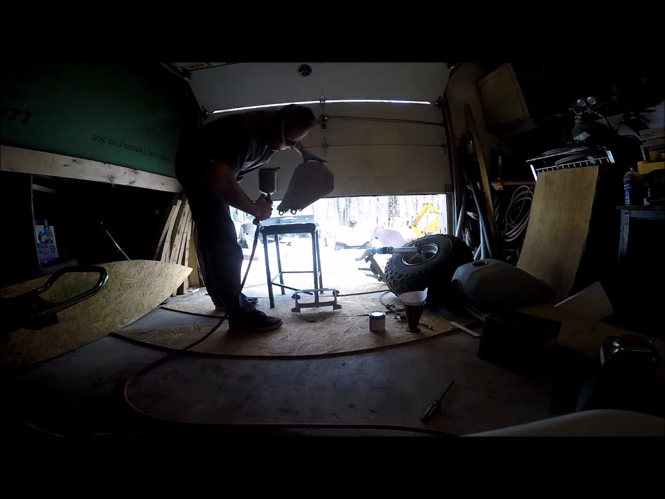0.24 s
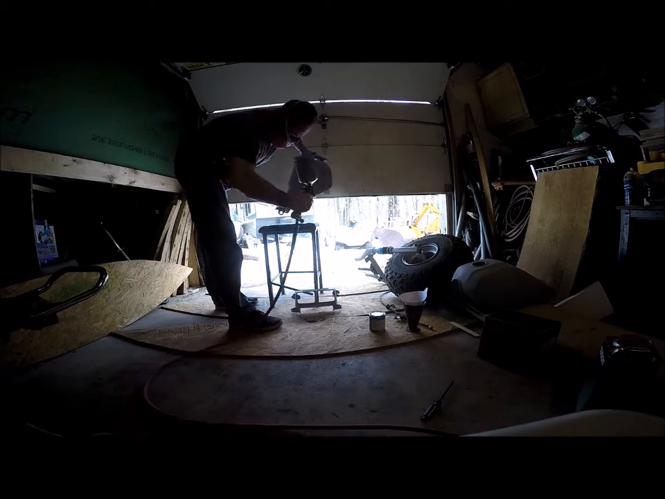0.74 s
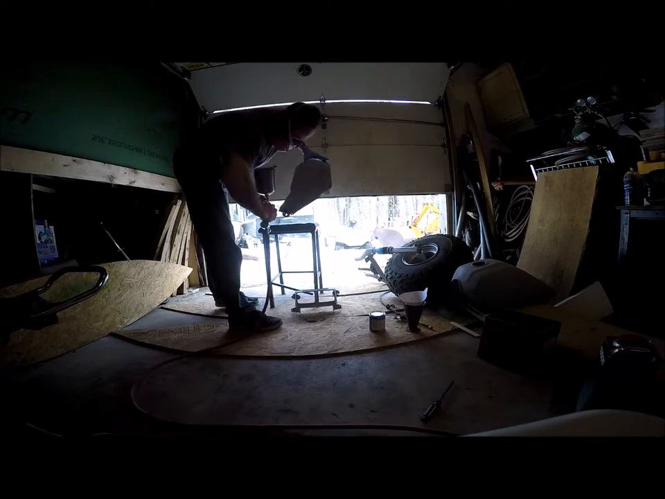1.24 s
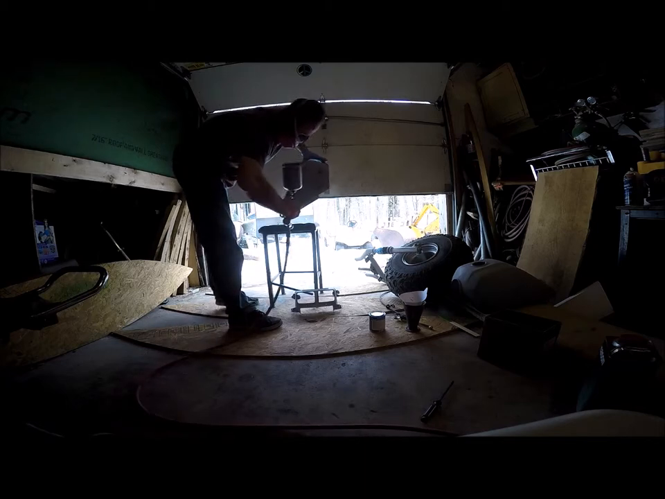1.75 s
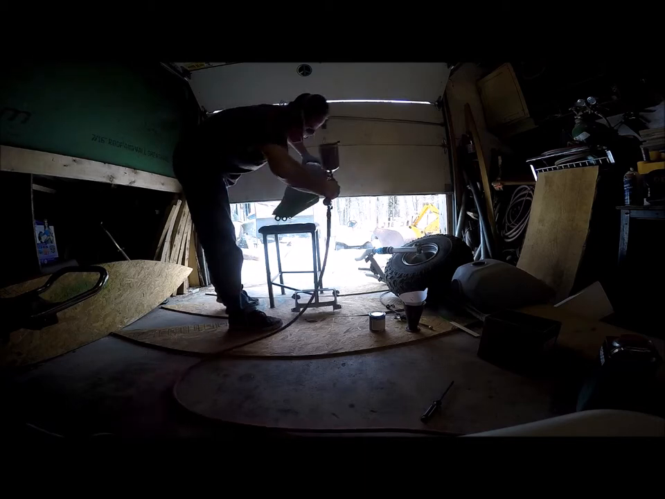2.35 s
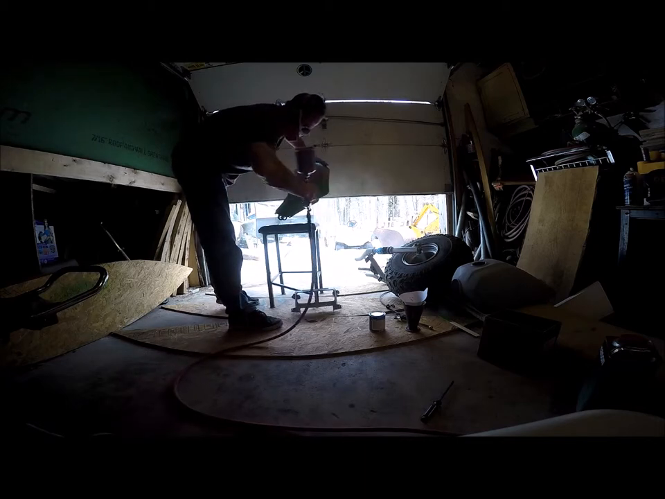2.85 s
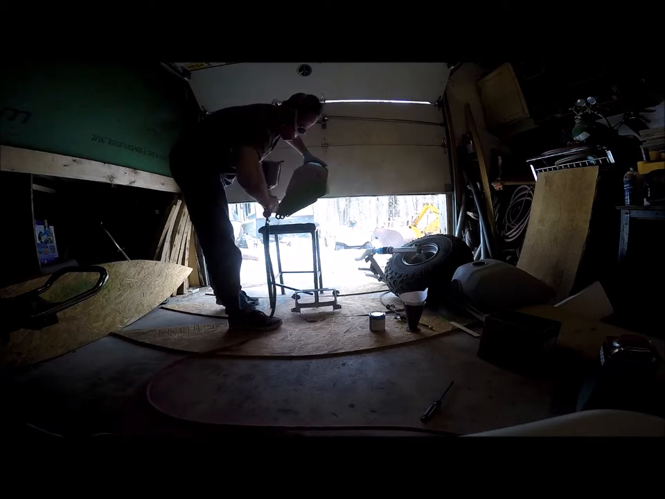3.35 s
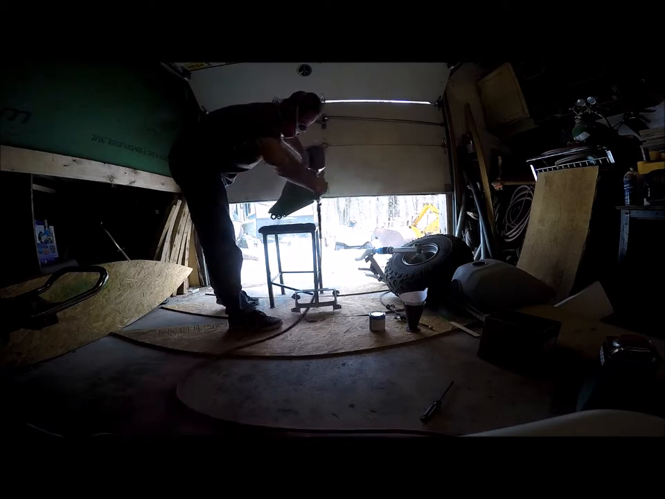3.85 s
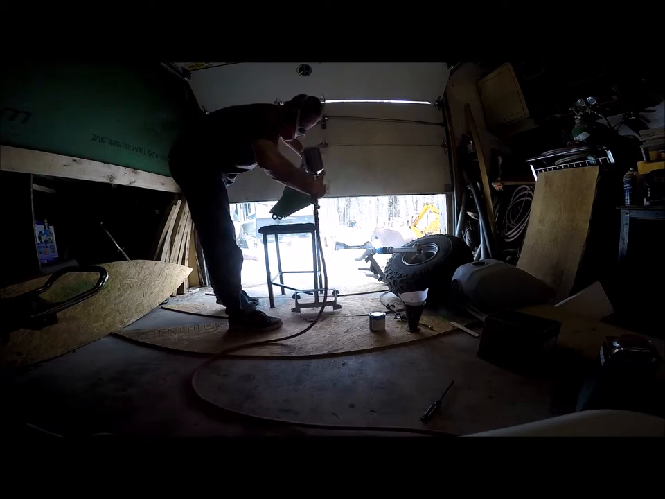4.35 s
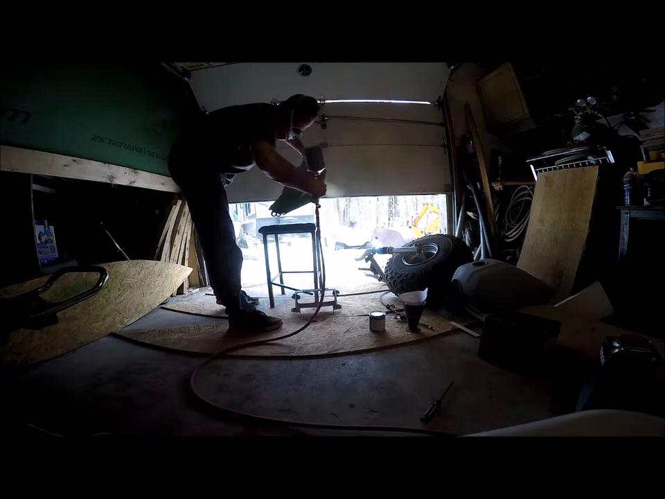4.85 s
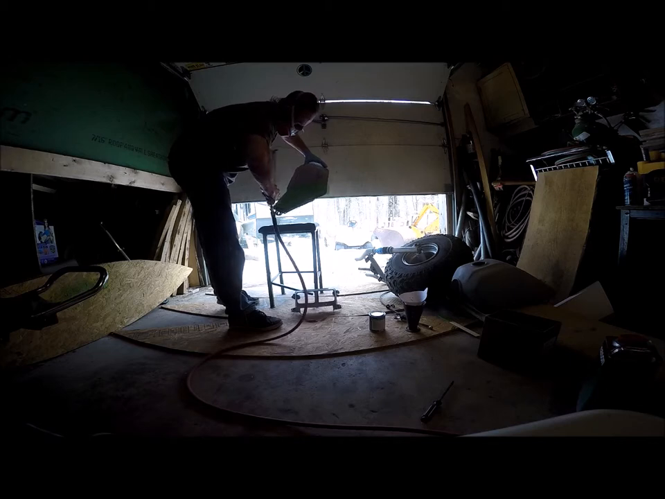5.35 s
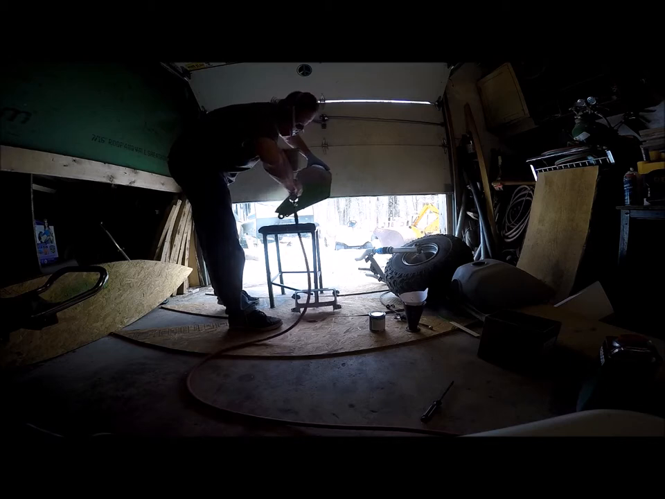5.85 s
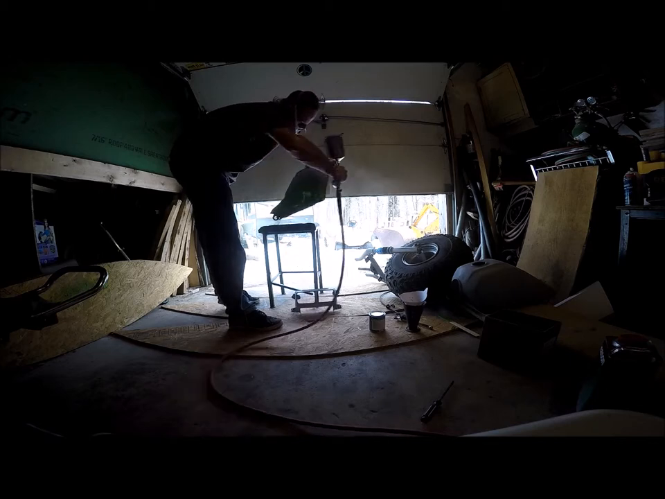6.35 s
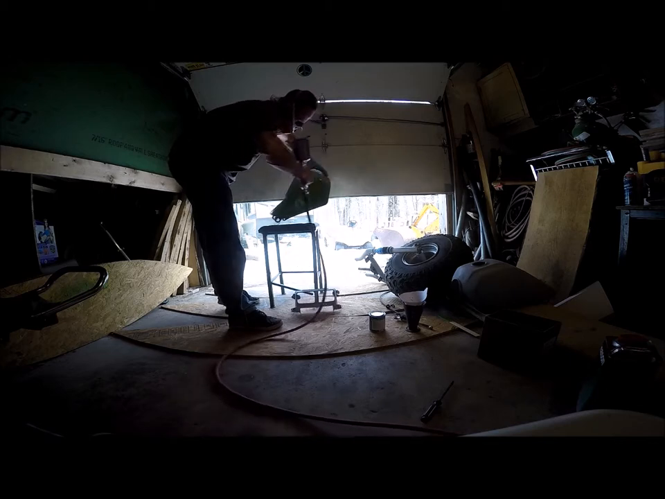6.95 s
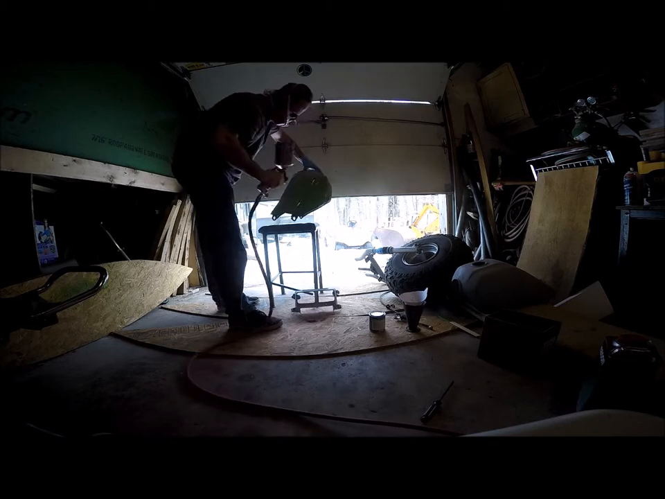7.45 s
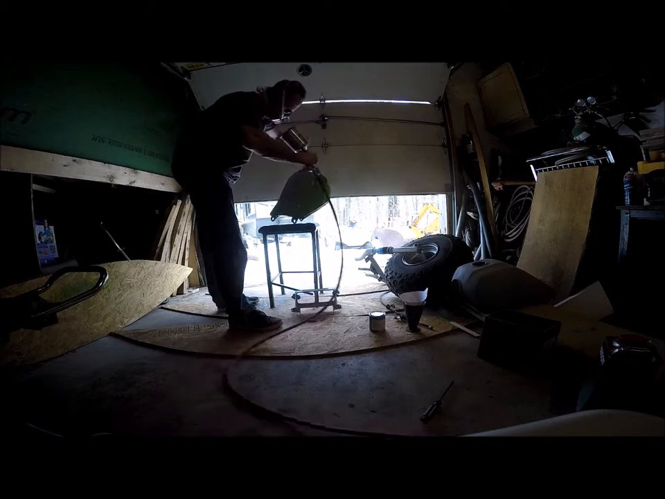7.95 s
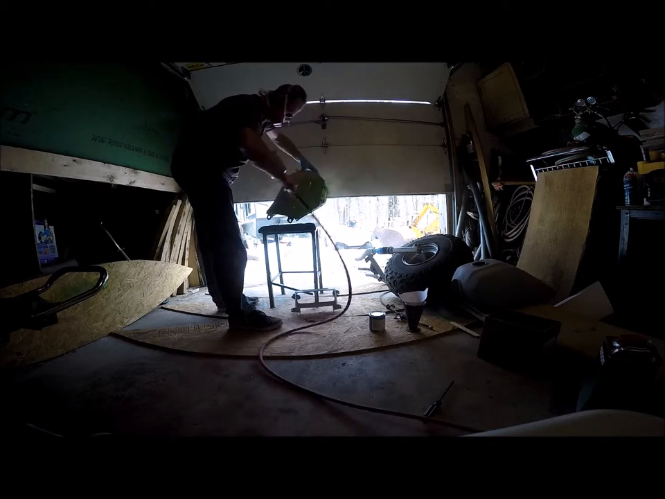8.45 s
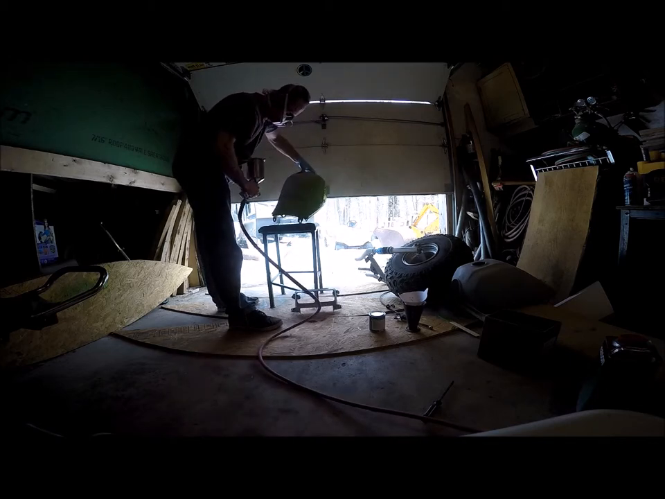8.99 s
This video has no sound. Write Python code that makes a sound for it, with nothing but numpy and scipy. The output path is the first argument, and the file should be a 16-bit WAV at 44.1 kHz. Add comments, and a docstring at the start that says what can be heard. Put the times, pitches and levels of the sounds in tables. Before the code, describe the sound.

A compressed-air spray gun works in short passes in a cluttered garage, heard in mono from a few metres away, with a short roomy tail. Quiet low rumble and faint hum lie underneath. Bright hissing bursts run at about 0.3-0.7, 1.5-2.3, 2.6-3.3, 3.5-4.0, 4.8-5.2, 5.7-6.3, 6.7-7.2, 8.1-8.7 and, somewhat softer, 9.1-9.6 seconds. Each opens with a quick louder surge and low puff, settles to a steady jet, and shuts fast with another soft puff; a thin hose hiss then sinks and fades. The jet slaps the panel at 0.3 and more strongly at 2.6, and a hollow roar swells as it sweeps across, clearest near 0.5 and 1.8-2.1. Low fluttering buzzes appear around 7.0 and 8.4. Soft scuffs fall near 2.4, 3.4, 7.3 and 8.1.

```python
"""In a cluttered garage, a compressed-air spray gun makes nine short passes over a hanging panel.
Each trigger pull lets stored hose pressure out as a surge of hiss that settles to a steady jet, with puffs
at start and stop; the jet roars, slaps and at times flutters on the panel: coloured noise, modes and sines.
Resonances of the air line sing on as it refills, and soft scuffs of noise fall between passes.
A low rumble and a faint hum lie underneath; sparse echoes give the room, heard in mono a few metres away."""
import sys
import numpy as np
from scipy import signal
from scipy.fft import rfft, irfft
from scipy.io import wavfile
from scipy.ndimage import uniform_filter1d

SR = 44100
rng = np.random.default_rng(int(sys.argv[2]) if len(sys.argv) > 2 else 0)


def pcm_store(signal):
    """Save signal as 16-bit PCM."""
    levels = np.round(np.clip(np.atleast_2d(signal), -1, 1) * 32767)
    wavfile.write(sys.argv[1], SR, levels.astype(np.int16).T)


N = 406602
TIME = np.arange(N) / SR
# times and frequencies of the noise spectrogram, in frames of 1024 samples every 256
FRAME_S = np.arange(N // 256 + 5)[:, None] * 256 / SR
BIN_HZ = np.fft.rfftfreq(1024, 1 / SR)


def gain_of(db):
    """Decibels to amplitude."""
    return 10 ** (np.asarray(db) / 20)


def evened(x):
    """Scales to rms 1."""
    return x / np.sqrt(np.mean(x ** 2) + 1e-20)


def steadied(x):
    """Holds narrow noise near rms 1 over every twentieth of a second."""
    return x / np.sqrt(uniform_filter1d(x ** 2, size=2200) + 1e-6)


def read(points, hz=BIN_HZ):
    """Joins the points of a curve by straight lines on a log-frequency axis."""
    point_hz, value = np.transpose(points)
    return np.interp(np.log(hz + 1), np.log(point_hz + 1), value)


def noise(colour_db, patchy_db):
    """Noise of rms 1 with a given colour and small drifting patches of turbulence."""
    real, imaginary, patches = rng.standard_normal((3, len(FRAME_S), len(BIN_HZ)))
    patches = uniform_filter1d(patches, size=8, axis=0)
    patches = evened(uniform_filter1d(patches, size=8, axis=1))
    spectrum = (real + 1j * imaginary) * gain_of(colour_db + patchy_db * patches)
    return evened(signal.istft(spectrum.T, nperseg=1024, noverlap=768)[1][:N])


def resonate(x, hz, width):
    """A resonance of gain 1 that can follow a moving frequency."""
    # shift the resonance down to 0 Hz, smooth there, shift back up
    turn = np.exp(2j * np.pi * np.cumsum(hz * np.ones(len(x))) / SR)
    r = np.exp(-np.pi * width / SR)
    return 2 * (turn * signal.lfilter([1 - r], [1, -r], x / turn + 1e-18)).real


def ringing(hz, width):
    """White noise through the same resonance twice, at rms 1."""
    once = resonate(rng.standard_normal(N), hz, width)
    return evened(resonate(once, hz, width))


def swell(s, length):
    """A smooth hump of height 1 centred on s, taking length to rise and again to fall."""
    return np.cos(np.pi / 2 * np.clip((TIME - s) / length, -1, 1)) ** 2


def gust(s, rise_s):
    """A push that starts at s, peaks at 1 after rise_s and dies away."""
    u = np.maximum(TIME - s, 0) / rise_s
    return u * np.exp(1 - u)


def valve(pulled, released, opening_s=0.018, closing_s=0.011):
    """Air flow of one pass: the valve opens fast, and the air cap empties after it shuts."""
    opening = np.clip((TIME - pulled) / opening_s, 0, 1) ** 1.27
    return opening * np.exp(-np.maximum(TIME - released, 0) / closing_s)


# Colour of the garage's rumble and thin hiss. Each row: frequency in Hz, density in dB per Hz (relative).
GARAGE_COLOUR = [(15, -20), (25, -4), (55, 0), (85, -6), (120, -4), (150, -15), (330, -11.5), (450, -9),
                 (560, -22), (1300, -27), (6000, -27.5), (7500, -35), (15000, -40.5)]
# Faint wavering hum. Each row: frequency in Hz, level in dB.
HUM_TONES = [(58, -62), (118, -66)]


def background(level_db=-54):
    """Low rumble and thin hiss drift slowly in level; narrow bands of noise make a wavering hum."""
    hum = sum(gain_of(db) * ringing(hz, width=3.3) for hz, db in HUM_TONES)
    drift_hz = np.geomspace(.7, 6, 10)
    drift_db = evened(sum(np.sin(2 * np.pi * (hz * FRAME_S + rng.random())) for hz in drift_hz))
    return gain_of(level_db) * noise(read(GARAGE_COLOUR) + drift_db, patchy_db=0.5) + hum


# The nine passes of the gun. Each row: trigger pulled in seconds, trigger released in seconds,
# steady hiss in dB, surge above it in dB, opening puff in dB, closing puff in dB.
GUN_PASSES = [(0.282, 0.696, -31, 5.5, -34, -39), (1.492, 2.304, -31, 4.5, -37, -43.5),
              (2.64, 3.288, -31, 6.5, -36.5, -40), (3.497, 4.014, -30.5, 4.5, -37.5, -39.5),
              (4.824, 5.166, -31, 6.5, -38.5, -40), (5.659, 6.346, -31, 4, -40, -45),
              (6.693, 7.183, -30.5, 5, -38, -38), (8.148, 8.686, -31, 6, -41, -38),
              (9.143, 9.6, -34.5, 7, -38, -42)]
# Colour of the nozzle hiss. Each row: frequency in Hz, density in dB per Hz (relative).
HISS_COLOUR = [(150, -36), (700, -24), (1000, -16.5), (1230, -23.5), (1500, -14.5), (1850, -14.5),
               (2350, -8.5), (3200, -8), (3950, -4), (4500, -5.5), (5300, -0.5), (6300, -3.5), (7100, -7.5),
               (8750, -12.5), (9700, -10), (11900, -12), (13100, -9), (15300, -14)]


def jet(surge_s=0.049, shake=0.065):
    """Nozzle hiss: the pressure stored in the hose overshoots, then settles to a steady flow."""
    flow, level = np.zeros(N), np.zeros(N)
    for pulled, released, hiss_db, surge_db, *_ in GUN_PASSES:
        held = np.clip(TIME - pulled, 0, released - pulled)
        stored = np.exp(-(held / surge_s) ** 4)
        burst = valve(pulled, released) * gain_of(surge_db * stored)
        flow += burst
        level += gain_of(hiss_db) * burst
    unsteady = 1 + shake * evened(uniform_filter1d(rng.standard_normal(N), size=500))
    hiss = noise(read(HISS_COLOUR) + reflections_db(), patchy_db=0.46)
    # a faster jet is brighter: the treble grows more steeply with the flow
    treble_filter = signal.butter(2, 7500, "high", fs=SR, output="sos")
    treble = signal.sosfiltfilt(treble_filter, hiss)
    hiss = hiss + treble * (flow ** 0.8 - 1)
    return level * unsteady * hiss


def reflections_db(strength=0.085, count=6):
    """Floor, door and panel echoes comb the hiss; the combs slide as the gun sweeps to and fro."""
    ends = np.array(GUN_PASSES)[:, :2].ravel()
    # the gun crosses from one side to the other during a pass and waits there for the next
    place = np.interp(FRAME_S, ends, np.resize([-1, 1, 1, -1], len(ends)))
    total = 1
    for near, slide in rng.random((count, 2)):
        delay_s = .0015 + .007 * near + 0.00096 * (2 * slide - 1) * place
        total = total + strength * np.exp(-2j * np.pi * BIN_HZ * delay_s)
    return 20 * np.log10(abs(total) + 1e-3)


# Colour of the puffs. Each row: frequency in Hz, density in dB per Hz (relative).
PUFF_COLOUR = [(20, 6.5), (40, 4.5), (60, 6), (90, -9), (150, -12), (250, -25), (600, -37), (2000, -97)]


def puffs(open_s=0.015, shut_s=0.015):
    """Every start and stop of the air flow gives the room a low push."""
    push = np.zeros(N)
    for pulled, released, _, _, opening_db, closing_db in GUN_PASSES:
        push += gain_of(opening_db) * gust(pulled, open_s)
        push += gain_of(closing_db) * gust(released - .016, shut_s)
    return push * steadied(noise(read(PUFF_COLOUR), patchy_db=0.5))


# Colour of the roar on the panel. Each row: frequency in Hz, density in dB per Hz (relative).
ROAR_COLOUR = [(60, -25), (110, -20), (165, -11), (195, -13), (225, 0), (265, -15), (318, 1), (347, -7),
               (381, 1), (420, -7), (470, -6), (600, -20), (950, -17), (1500, -23), (4000, -54)]
# The jet sweeps across the panel. Each row: squarely on it in seconds,
# time to swell and again to fade in seconds, roar in dB.
PANEL_CROSSINGS = [(0.48, 0.2, -39), (1.82, 0.34, -44.5), (2.11, 0.23, -46.5), (2.8, 0.3, -53.5),
                   (3.9, 0.17, -48), (4.97, 0.13, -50), (6.28, 0.12, -52.5), (6.8, 0.14, -59),
                   (8.65, 0.037, -45.5), (9.2, 0.17, -52)]


def panel(grazing_db=-54):
    """The jet breaks on the panel with a hollow roar that swells each time it sweeps across."""
    flow = sum(valve(pulled, released, opening_s=0.02, closing_s=0.025)
               for pulled, released, *_ in GUN_PASSES)
    # between crossings only the edge of the fan of spray touches the panel
    contact = gain_of(grazing_db) + sum(gain_of(db) * swell(s, length) for s, length, db in PANEL_CROSSINGS)
    return contact * flow * noise(read(ROAR_COLOUR), patchy_db=1.0)


def eddies(level_db=-54, hz=95, width=90):
    """Low eddies trail the air stream, a broad resonance of noise that follows the flow."""
    flow = sum(valve(pulled, released, opening_s=0.096, closing_s=0.022)
               for pulled, released, *_ in GUN_PASSES)
    return gain_of(level_db) * flow * ringing(hz, width)


# Resonances of the air line as it refills. Each row: frequency in Hz, width in Hz, relative level in dB.
LINE_RESONANCES = [(2200, 260, -6.5), (4200, 1400, -5), (6100, 1000, 0), (7900, 800, -14),
                   (10600, 1000, -13)]


def air_line(level_db=-47, refill_s=.16, full_s=.37, sink_per_s=.25):
    """Air keeps running into the hose after release; its resonances sink and fade as it fills."""
    flow, since = np.zeros(N), np.zeros(N)
    for pulled, released, *_ in GUN_PASSES:
        unfilled = np.exp(-(np.maximum(TIME - released, 0) / full_s) ** 4)
        flow += valve(pulled, released, opening_s=0.075, closing_s=refill_s) * unfilled
        # seconds since the latest release, at most half a second
        since = np.where(TIME > pulled, np.clip(TIME - released, 0, .5), since)
    sink = 1 - sink_per_s * since
    tones = sum(gain_of(db) * ringing(hz * sink, width) for hz, width, db in LINE_RESONANCES)
    return gain_of(level_db) * flow * evened(tones)


# The jet slaps the panel as it starts at close range. Each row: start in seconds, level in dB.
PANEL_SLAPS = [(0.287, -40), (2.642, -30)]
# Modes of the panel. Each row: frequency in Hz, width in Hz, relative level in dB.
PANEL_MODES = [(205, 49, -8.5), (338, 41, 0), (376, 25, -2), (482, 130, -2.5), (950, 200, -10)]


def slaps(rise_s=0.025):
    """A sudden gust on the panel sets its low modes booming for a moment."""
    boom = sum(gain_of(db) * ringing(hz, width) for hz, width, db in PANEL_MODES)
    return steadied(boom) * sum(gain_of(db) * gust(s, rise_s) for s, db in PANEL_SLAPS)


# Soft scuffs of hose, shoes and clothes between passes. Each row: centre of the rub in seconds,
# centre frequency in Hz, width in octaves, level in dB.
SOFT_SCUFFS = [(2.425, 350, .35, -50), (2.425, 2500, 1, -56), (3.41, 350, .35, -51), (3.43, 2400, .8, -54),
               (7.27, 600, 1.3, -55), (7.41, 800, 1.3, -54), (8.0, 4500, .8, -62), (8.09, 400, .6, -53),
               (8.1, 3000, 1.3, -57)]


def scuffs():
    """Short soft rubs, each a hump of noise around its own centre frequency."""
    hz, out = np.fft.rfftfreq(SR, 1 / SR) + 1, np.zeros(N)
    for s, centre, octaves, db in SOFT_SCUFFS:
        colour = 1 / (1 + (np.log2(hz / centre) / octaves) ** 4)
        rub = evened(irfft(rfft(rng.standard_normal(SR)) * colour))
        out += gain_of(db) * swell(s, .07) * np.resize(rub, N)
    return out


# Flutters at the panel's edge. Each row: centre in seconds, time to swell and again to fade in seconds,
# pitch in Hz, level of the peak in dB.
EDGE_FLUTTERS = [(6.97, 0.11, 97, -46), (7.08, 0.044, 102, -42), (8.37, 0.13, 100.4, -41.5),
                 (8.53, 0.15, 102, -47)]


def flutters():
    """The air stream locks into a flutter at the panel's edge: a low sine that swells and fades."""
    out = np.zeros(N)
    for s, length, pitch, db in EDGE_FLUTTERS:
        out += gain_of(db) * swell(s, length) * np.sin(2 * np.pi * (pitch * TIME + rng.random()))
    return out


# Reverberation of the garage. Each row: frequency in Hz, time to die by 60 dB in seconds.
ROOM_DECAY = [(100, 0.58), (400, 0.51), (1200, 0.24), (3000, 0.33), (6000, 0.3), (9000, 0.22),
              (14000, 0.29)]


def room_tail():
    """Sparse echoes of random sign, each band dying at its own speed."""
    at = np.arange(350, SR - 20, 20)
    taps = np.zeros(SR)
    taps[at + rng.integers(0, 20, len(at))] = rng.choice([-1., 1.], len(at))
    hz, t, bands = signal.stft(taps, nperseg=256, fs=SR)
    decay_db = -60 * t / read(ROOM_DECAY, hz)[:, None]
    tail = signal.istft(bands * gain_of(decay_db), nperseg=256)[1]
    return tail / np.linalg.norm(tail)


def reverberate(x, turn_hz=1.117, count=4):
    """Several sets of room echoes fade into one another in turn, so the room's colour keeps shifting."""
    wet = np.zeros(N)
    for k in range(count):
        # the squares of the shares add up to 1 at all times
        share = np.cos(np.pi * (turn_hz * TIME + k / count)) / np.sqrt(count / 2)
        wet += signal.fftconvolve(x * share, room_tail())[:N]
    return wet


def scene(room_db=-4):
    """The gun and its hose in the garage, alike in both channels."""
    near = jet() + panel() + scuffs()
    mono = near + gain_of(room_db) * reverberate(near)
    mono += background() + puffs() + slaps() + eddies() + flutters() + air_line()
    return np.array([mono, mono])


def record(dry, edge_hz=15400):
    """A steep low-pass limits the band at its upper edge."""
    low_pass = signal.firwin(1023, edge_hz, window=("kaiser", 8), fs=SR)
    return signal.oaconvolve(dry, low_pass[None], "same", axes=1)


dry = scene()
out = record(dry)
pcm_store(out)
```